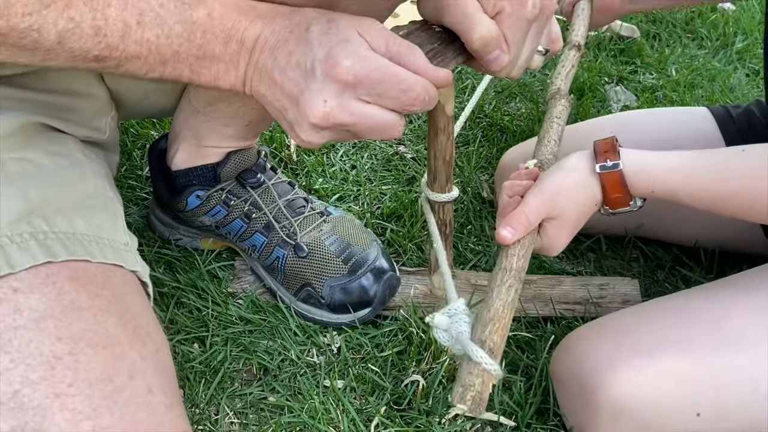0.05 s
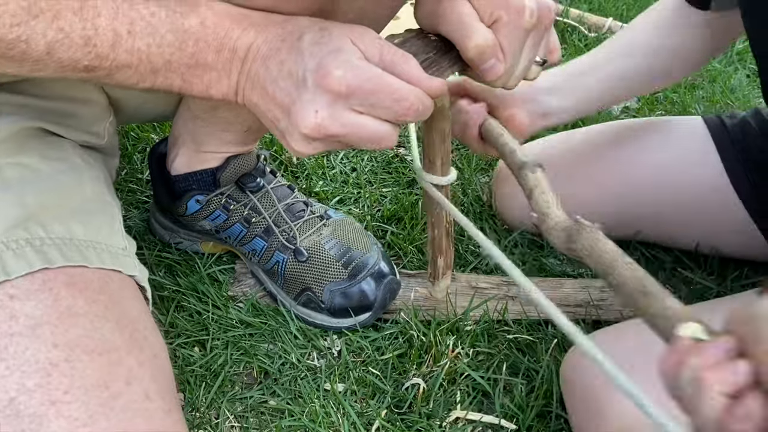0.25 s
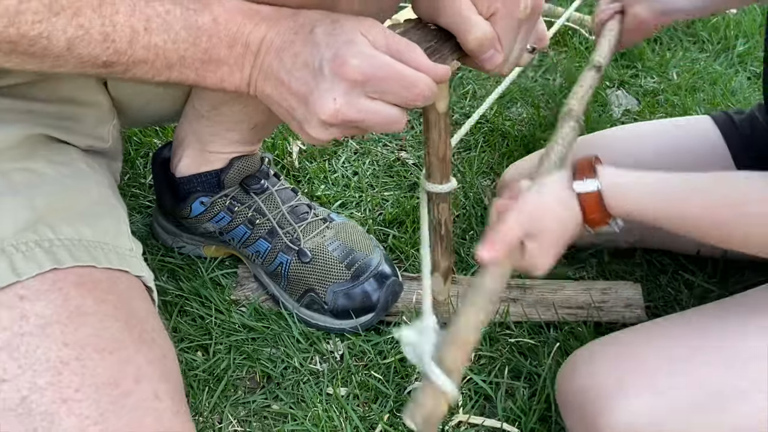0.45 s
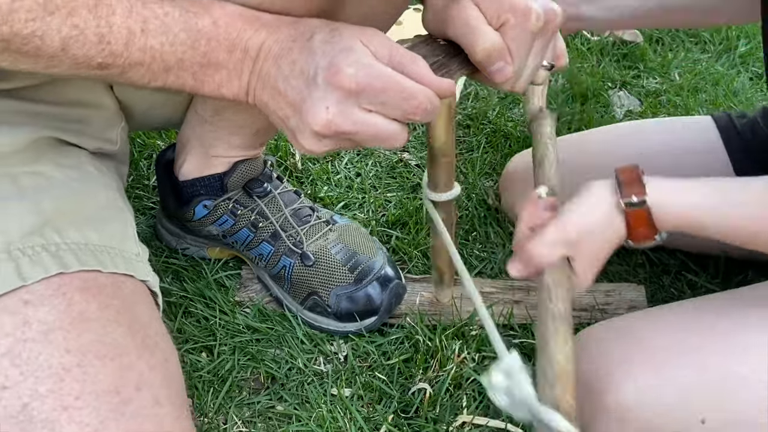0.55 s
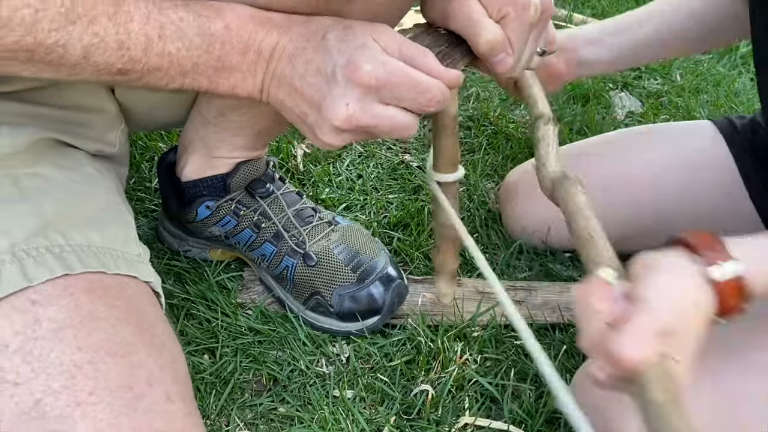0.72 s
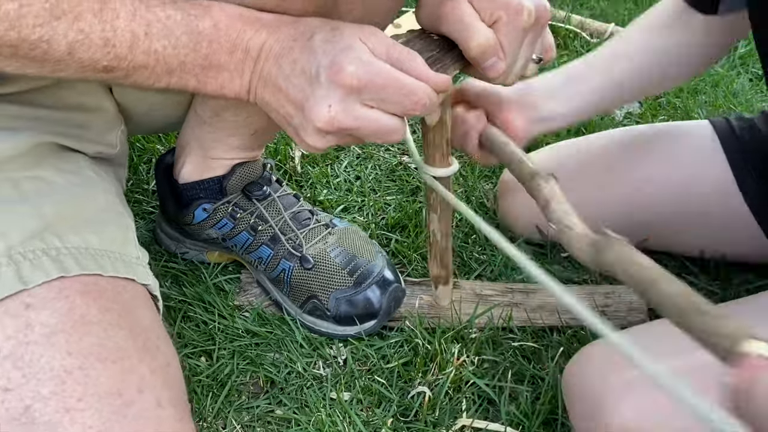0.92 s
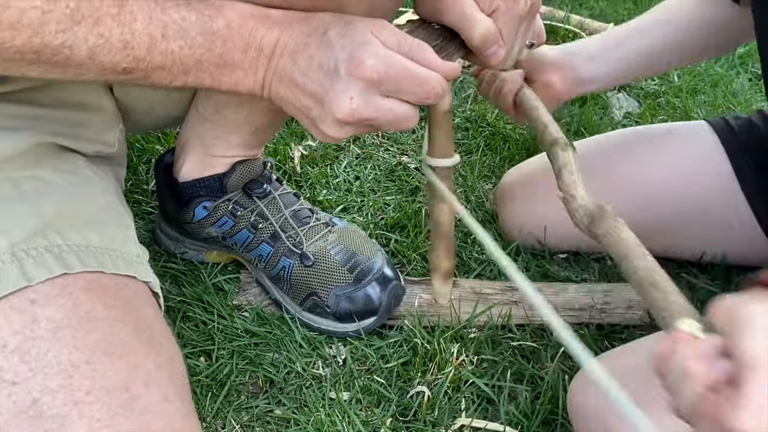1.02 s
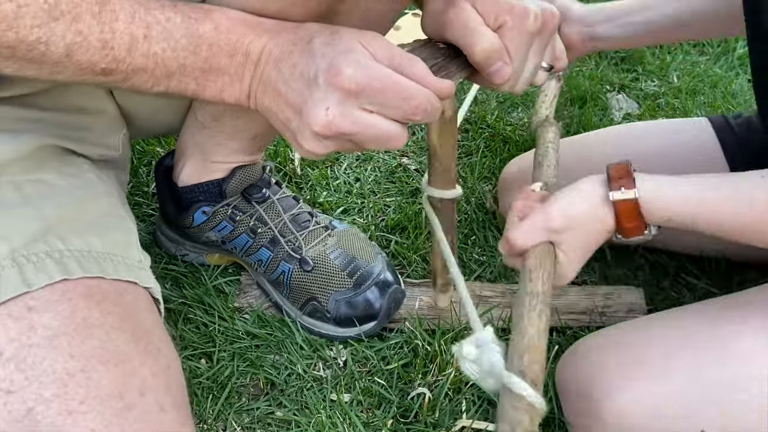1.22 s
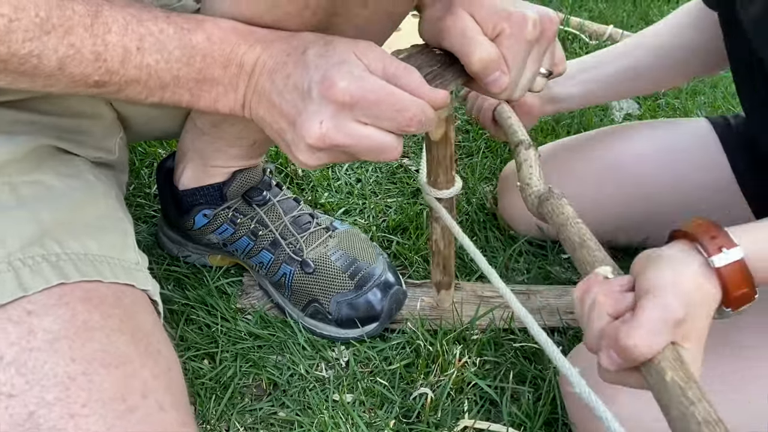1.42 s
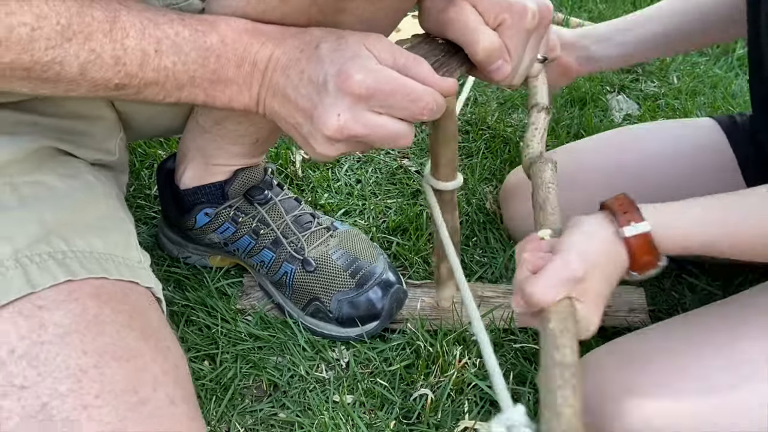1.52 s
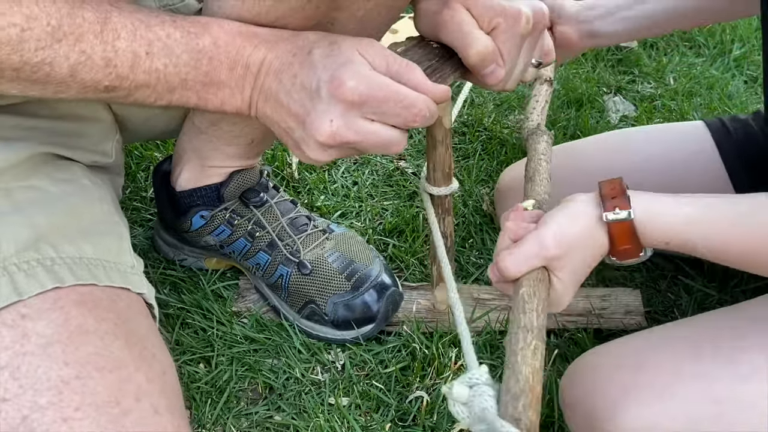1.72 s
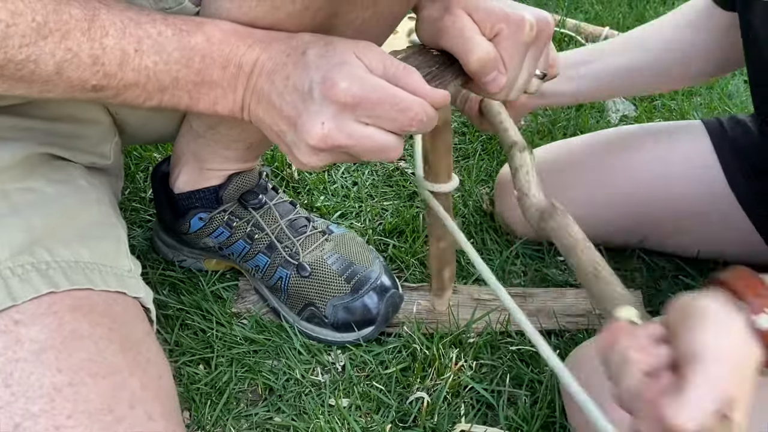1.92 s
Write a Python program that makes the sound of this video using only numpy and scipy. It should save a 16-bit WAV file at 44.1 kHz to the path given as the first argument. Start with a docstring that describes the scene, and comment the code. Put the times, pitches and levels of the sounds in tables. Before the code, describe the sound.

A wooden bow drill squeaks sharply and rubs dryly, sawed back and forth outdoors.

```python
"""Sharp wooden squeaks, three to a stroke, alternate with dry rubbing: a bow drill sawed on a board.
On one stroke the spindle grabs and squeaks by stick-slip; each squeak sags in pitch, and most break to
the octave below. On the other it rubs with a hiss and small catches. Cord and spindle creak and tick
at some turns. The moving arms and bow add a low rumble.
Heard outdoors, close up, through two microphone ports."""
import sys
import numpy as np
from scipy import signal
from scipy.fft import rfft, irfft, next_fast_len
from scipy.io import wavfile
from scipy.ndimage import map_coordinates

SR = 44100
rng = np.random.default_rng(int(sys.argv[2]) if len(sys.argv) > 2 else 0)


def master_out(mix):
    """Clip the mix to full scale and print it as 16-bit PCM to the path in sys.argv[1]."""
    frames = np.transpose(np.atleast_2d(mix))
    ceiling = np.clip(frames, -1, 1)
    pcm = np.round(ceiling * 32767).astype(np.int16)
    wavfile.write(sys.argv[1], SR, pcm)


N = 85995

# Noise spectra. Each row: frequency in Hz, gain in dB.
AIR_SPECTRUM = [(100, 11), (400, -10.5), (2100, -8), (16000, -40.5)]
RUMBLE_SPECTRUM = [(24, -34.5), (55, 5), (95, 1), (220, -15.5), (400, -24), (3000, -68)]
RUB_SPECTRUM = [(200, 1), (1000, 0.5), (1450, -1.5), (2000, 6.5), (2400, -5.5), (3700, 8), (4600, 4),
                (5250, 4.5), (7300, 6), (8800, -3.5), (15500, -4)]
TICK_SPECTRUM = [(500, -8.5), (1600, 6.5), (2500, -4.5), (15000, -20)]
SCRAPE_SPECTRUM = [(330, 3.5), (600, -9.5), (950, 6), (1500, -10.5), (2030, 4.5), (2500, -25.5)]
GRIT_SPECTRUM = [(650, -11), (1050, 7), (1450, -29), (1900, 7.5), (2500, -4.5), (3600, 5), (7500, 1.5),
                 (16000, -15)]
# Bow strokes, turn to turn. Each row: start in seconds, end in seconds, rubbing level in dB.
BOW_STROKES = [(-.17, 0.141, -42.5), (0.106, 0.425, -42), (0.4, 0.768, -42), (0.729, 1.064, -45.5),
               (1.073, 1.449, -43), (1.393, 1.723, -48), (1.721, 2.039, -43)]
# Swings of arms and bow. Each row: centre in seconds, level in dB.
ARM_SWELLS = [(0.029, -35.5), (0.139, -43), (0.776, -43.5), (0.838, -36.5), (0.908, -47.5), (1.217, -42)]
# Soft bow bumps. Each row: start in seconds, level in dB, pitch in Hz.
BOW_BUMPS = [(0.848, -31.5, 192)]
# Spindle ticks in the socket. Each row: start in seconds, level in dB.
SPINDLE_TICKS = [(0.143, -46.5), (.772, -39)]
# Brief slips of cord and spindle. Each row: centre in seconds, level in dB, pitch in Hz.
CORD_CREAKS = [(.148, -42.5, 1013), (1.443, -49, 688.4)]
SPINDLE_CATCHES = [(.005, -36.5, 844), (0.041, -43, 1000), (.531, -45, 860), (.646, -31, 970),
                   (1.286, -40.5, 943), (1.337, -35, 1036), (1.845, -40.5, 887), (1.889, -35.5, 994),
                   (1.9295, -30, 989)]
SPINDLE_CHIRPS = [(.2672, -13, 1816), (.3095, -23.5, 1790), (.376, -35, 2006), (.9175, -28.5, 2060),
                  (.928, -25, 1787), (1.5305, -19, 2265), (1.5822, -19.5, 1885)]
# Octave breaks. Each row: start and hold in seconds, rasp level in dB, pitch in Hz, low note level in dB.
OCTAVE_BREAKS = [ (0.2431, 0.0027, -5.5, 1061, -17), (0.2913, 0.0054, -21, 926, -28),
                 (0.3373, 0.0011, -21.5, 899.4, -42.5), (0.8977, .0075, -11, 1053, -21),
                 (0.95, 0.0066, -22, 979, -28.5), (1.536, 0.0016, -17.5, 1163, -13),
                 (1.541, .0135, -10.5, 1096, -17.5), (1.6076, 0.0024, -12.5, 1008, -15.5),
                 (1.6138, .003, -16, 1017, -35), (1.6629, .0035, -16.5, 1037, -26.5)]
# Spindle grabs. Each row: start and hold in seconds, level in dB, settled pitch in Hz,
# top overtone gain in dB, roughness factor.
SPINDLE_SQUEAKS = [ (0.2302, 0.0095, -10.5, 2129, 6, 0.3), (0.2885, 0.005, -9.5, 1776, -1.5, 1),
                   (0.3266, 0.0076, -11.5, 1707, -5, 1.1), (0.888, 0.0062, -10, 2027, 3.5, 0.4),
                   (0.9449, 0.0068, -8.5, 1907, -2, 0.5), (0.995, 0.0049, -15.5, 1882, -14, 0.5),
                   (1.5305, 0.009, -16.5, 2064, 3, 0.9), (1.6005, 0.0145, -12, 2004, -1.5, 0.1),
                   (1.658, 0.0076, -16.5, 1991, -6, 0.2)]
# Spectral envelopes of the partials. Each row: frequency in Hz, gain in dB.
BREAK_SPECTRUM = [(2100, -8), (3100, 0.5), (4100, -8), (6200, -18), (7500, -12), (14000, -25.5)]
SQUEAK_SPECTRUM = [(2000, -6), (4100, -0.5), (6100, -6), (8000, -5), (12400, -17), (15000, -27)]
# Phase between the ports. Each row: frequency in Hz, left lead in radians.
PORT_LEAD = [(1700, 0), (2200, .75), (4500, .7), (7300, -.1), (9000, -3.14), (11200, -6.3), (13300, -9.4),
             (14700, -12.5)]
# Balance of the ports. Each row: frequency in Hz, left minus right in dB.
PORT_LEVEL = [(150, .3), (1000, 4), (2000, -1), (3500, 1.5), (5100, 2.5), (6500, .2)]

TIME_S = np.arange(N) / SR


def amp(db):
    return 10 ** (np.asarray(db) / 20)


def unit_rms(x):
    return x / np.sqrt(np.mean(x ** 2) + 1e-20)


def curve_at(points, hz):
    """Interpolate (Hz, value) points on a log axis."""
    knots_hz, values = np.transpose(points)
    return np.interp(np.log(hz + 1), np.log(knots_hz + 1), values)


def around(at_s):
    """Sample indices near a moment, and their offsets in seconds."""
    i = np.flatnonzero(abs(TIME_S - at_s) < .07)
    return i, i / SR - at_s


def filtered(x, response):
    """Apply a complex frequency response."""
    size = next_fast_len(N + SR // 4)
    return irfft(rfft(x, size) * response(np.fft.rfftfreq(size, 1 / SR)), size)[..., :N]


def noise(spectrum):
    """Coloured noise, rms 1."""
    return unit_rms(filtered(rng.standard_normal(N), lambda hz: amp(curve_at(spectrum, hz))))


def stereo_noise(spectrum, apart_db=-5):
    """Common noise plus a separate part at each port."""
    return noise(spectrum) + amp(apart_db) * np.array([noise(spectrum), noise(spectrum)])


def wobble(rate_hz):
    """Smooth random curve over the whole scene."""
    return map_coordinates(rng.standard_normal(int(N * rate_hz / SR) + 4), [TIME_S * rate_hz])


def flutter(t, rate_hz=900):
    """Fast irregularity of the slips over a short stretch."""
    return map_coordinates(rng.standard_normal(512), [(t - t[0]) * rate_hz], mode="wrap")


def slip_phase(t, hz, rough, jitter=0.042):
    """Phase of stick-slip at an unsteady rate."""
    return 2 * np.pi * np.cumsum(hz * (1 + jitter * rough * flutter(t))) / SR


def partial(t, phase, rough, shimmer=0.44, smear_rad=0.19):
    """One partial, unsteady in level and phase."""
    drift_rad = rng.uniform(-np.pi, np.pi) + smear_rad * rough * flutter(t)
    return np.sin(phase + drift_rad) * (1 + shimmer * rough * flutter(t))


def slips(rows, half_width_s, glide_per_s, overtone_db, rough):
    """Short gliding four-partial tones under bell-shaped envelopes."""
    out = np.zeros(N)
    for centre_s, db, hz in rows:
        i, t = around(centre_s)
        phase = slip_phase(t, hz * np.exp(glide_per_s * t), rough)
        wave = sum(amp(overtone_db * k) * partial(t, (k + 1) * phase, rough) for k in range(4))
        out[i] += amp(db) * np.exp(-(t / half_width_s) ** 2) * wave
    return out


def grip_db(t, hold_s=np.inf, rise_db_per_s=2988.5, fall_db_per_s=3800.5):
    """Envelope of a grip: quick rise, hold, quick fall."""
    return -rise_db_per_s * np.maximum(-t, 0) - fall_db_per_s * np.maximum(t - hold_s, 0)


def bow_speed(start_s, end_s, skew=1.245):
    """Speed over one stroke, 0-1, peaking just after the middle."""
    progress = np.clip((TIME_S - start_s) / (end_s - start_s), 0, 1)
    return abs(np.sin(np.pi * progress ** skew))


def board(x, cutoff_hz=757):
    """The narrow board radiates little bass."""
    return filtered(x, lambda hz: 1 - 1 / (1 + (hz / cutoff_hz) ** 10))


def ports(x):
    """The two microphone ports differ in level and phase."""
    def response(hz):
        lead_rad = np.interp(hz, *np.transpose(PORT_LEAD))
        left = amp(curve_at(PORT_LEVEL, hz) / 2) * np.exp(.5j * lead_rad)
        return np.array([left, 1 / left])
    return filtered(x, response)


def air(level_db=-59):
    """Faint, steady outdoor noise."""
    return amp(level_db) * stereo_noise(AIR_SPECTRUM)


def scatter(x, level_db=-26.5, t60_s=.12):
    """Short echo off the ground and people kneeling nearby."""
    t = np.arange(SR // 4) / SR
    tail = rng.standard_normal((2, len(t))) * amp(-60 * t / t60_s)
    return amp(level_db) * signal.fftconvolve(x, tail / np.linalg.norm(tail[0]), axes=1)[:, :N]


def arm_rumble(rest_db=-57, stroke_gain_db=6.5, swell_half_width_s=.024):
    """Sawing arms and bow rumble, rising with speed and swelling on swings."""
    speed = sum(bow_speed(start_s, end_s) for start_s, end_s, _ in BOW_STROKES)
    swells = sum(amp(db) * np.exp(-((TIME_S - at_s) / swell_half_width_s) ** 2)
                 for at_s, db in ARM_SWELLS)
    envelope = amp(rest_db + stroke_gain_db * speed) + swells
    return envelope * unit_rms(stereo_noise(RUMBLE_SPECTRUM) + noise(RUMBLE_SPECTRUM))


def bow_bumps(rise_s=0.0031):
    """The bow bumps softly: a low, damped tone."""
    out = np.zeros(N)
    for start_s, db, hz in BOW_BUMPS:
        t = np.maximum(TIME_S - start_s, 0)
        envelope = t / rise_s * np.exp(1 - t / rise_s)
        out += amp(db) * envelope * np.sin(2 * np.pi * hz * t)
    return out


def rubbing(speed_power=2.06):
    """Dry wood on wood: grainy hiss that follows bow speed."""
    envelope = sum(amp(db) * bow_speed(start_s, end_s) ** speed_power
                   for start_s, end_s, db in BOW_STROKES)
    hiss = stereo_noise(RUB_SPECTRUM)
    grain_db = 1.5 * wobble(rate_hz=94) + 2.0 * wobble(rate_hz=600)
    return envelope * hiss * amp(grain_db)


def cord_creaks():
    """The cord creaks as the bow turns."""
    return slips(CORD_CREAKS, half_width_s=0.0024, glide_per_s=7, overtone_db=-0.5, rough=0.96)


def ticks(decay_s=0.0022):
    """The spindle ticks in its socket as it reverses."""
    envelope = sum(amp(db) * (TIME_S > at_s) * np.exp(-abs(TIME_S - at_s) / decay_s)
                   for at_s, db in SPINDLE_TICKS)
    return envelope * noise(TICK_SPECTRUM)


def catches(scrape_db=-4, fade_db_per_s=795):
    """The spindle snags: a falling creak over a scrape in the board's low resonances."""
    envelope = sum(amp(db + scrape_db - fade_db_per_s * abs(TIME_S - at_s))
                   for at_s, db, _ in SPINDLE_CATCHES)
    scrape = envelope * noise(SCRAPE_SPECTRUM)
    creak = slips(SPINDLE_CATCHES, half_width_s=0.0036, glide_per_s=-50, overtone_db=-15.5, rough=1.0)
    return scrape + creak


def chirps():
    """Brief, nearly pure slips around the squeaks."""
    return slips(SPINDLE_CHIRPS, half_width_s=0.0032, glide_per_s=-26, overtone_db=-14, rough=0.24)


def octave_breaks(rough=.45, sag_per_s=5.5, fade_db_per_hold=24.5, grit_db=-11):
    """The slips drop an octave: a gritty nasal rasp; the board takes up the low note late and rings."""
    low_lag_s, low_fade_db_per_s = 0.0039, 2400.5
    tone, grit_envelope = np.zeros(N), np.zeros(N)
    for start_s, hold_s, db, hz, low_db in OCTAVE_BREAKS:
        i, t = around(start_s)
        phase = slip_phase(t, hz * np.exp(-sag_per_s * t), rough)
        rasp_db = db + grip_db(t) - fade_db_per_hold * np.maximum(t - hold_s, 0) / hold_s
        for k in range(2, 14):
            tone[i] += amp(rasp_db + curve_at(BREAK_SPECTRUM, k * hz)) * partial(t, k * phase, rough)
        late_s = t - low_lag_s
        ring_db = low_db + grip_db(late_s) - low_fade_db_per_s * np.maximum(late_s - hold_s, 0)
        tone[i] += amp(ring_db) * partial(t, phase, rough)
        grit_envelope[i] += amp(rasp_db + grit_db)
    return board(tone + grit_envelope * stereo_noise(GRIT_SPECTRUM))


def squeaks(grab_hz=2247, lead_s=0.0044, settle_s=0.00478, sag_hz_per_s=3400):
    """Stick-slip: each grab starts on the same high note, sags to its own pitch, dulls and roughens."""
    sheen_above_hz, dulling_db_per_octave = 8700, 0.5
    grit_db, grit_growth_db = -15, 7
    tone, grit_envelope = np.zeros(N), np.zeros(N)
    for start_s, hold_s, db, hz, sheen_db, rough in SPINDLE_SQUEAKS:
        i, t = around(start_s)
        progress = np.clip(t / hold_s, 0, 1)
        gate_db = grip_db(t, hold_s)
        excess_hz = (grab_hz - hz) * np.exp(-np.maximum(t + lead_s, 0) / settle_s)
        phase = slip_phase(t, hz + excess_hz - sag_hz_per_s * t, rough)
        for k in range(1, 9):
            colour_db = curve_at(SQUEAK_SPECTRUM, k * hz) + sheen_db * (k * hz > sheen_above_hz)
            dulling_db = dulling_db_per_octave * progress * np.log2(k)
            level_db = db + colour_db - dulling_db + k * gate_db  # overtones switch faster
            tone[i] += amp(level_db) * partial(t, k * phase, rough)
        grit_envelope[i] += rough * amp(db + grit_db + 2 * gate_db + grit_growth_db * progress)
    return board(tone + grit_envelope * stereo_noise(GRIT_SPECTRUM))


def scene():
    """Drill, movement, air and echo at the two ports."""
    drill = chirps() + cord_creaks() + squeaks() + octave_breaks() + ticks() + catches()
    return ports(drill + air() + rubbing() + arm_rumble() + bow_bumps() + scatter(drill))


def record(dry):
    """The loudest squeak peaks are softly rounded and the highest treble is cut."""
    ceiling, top_hz = .94, 15900
    rounded = dry / (1 + (dry / ceiling) ** 8) ** (1 / 8)
    return filtered(rounded, lambda hz: hz < top_hz)


dry = scene()
out = record(dry)
master_out(out)
```